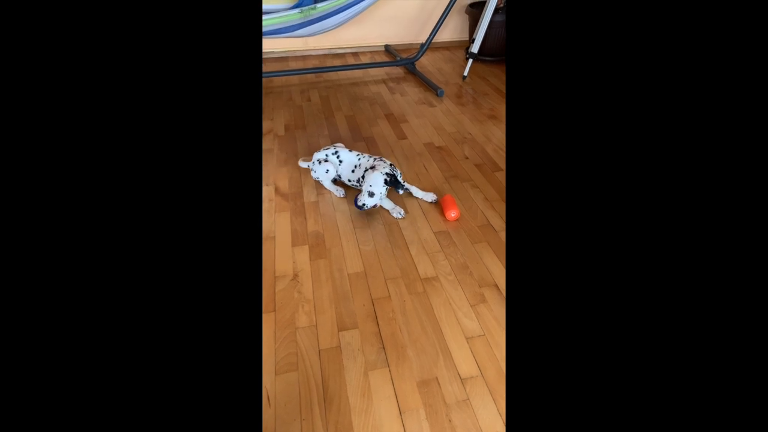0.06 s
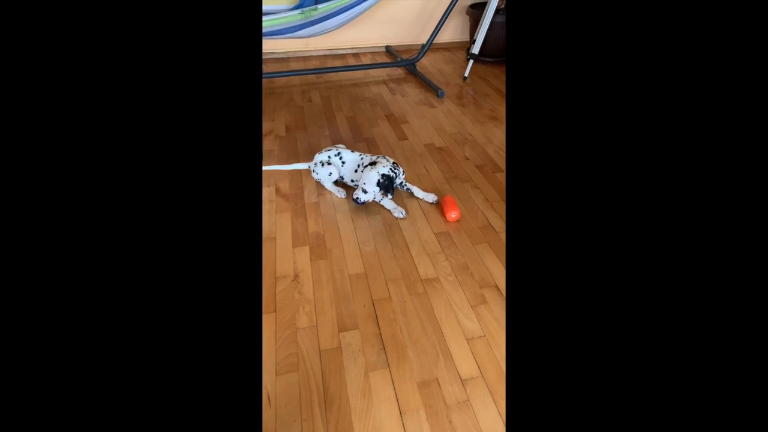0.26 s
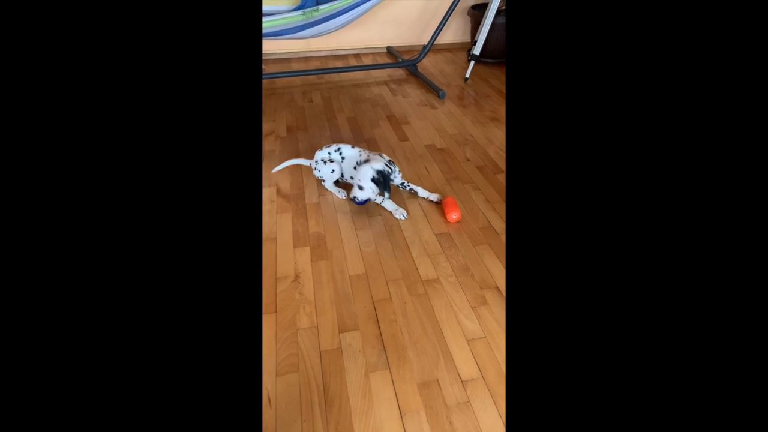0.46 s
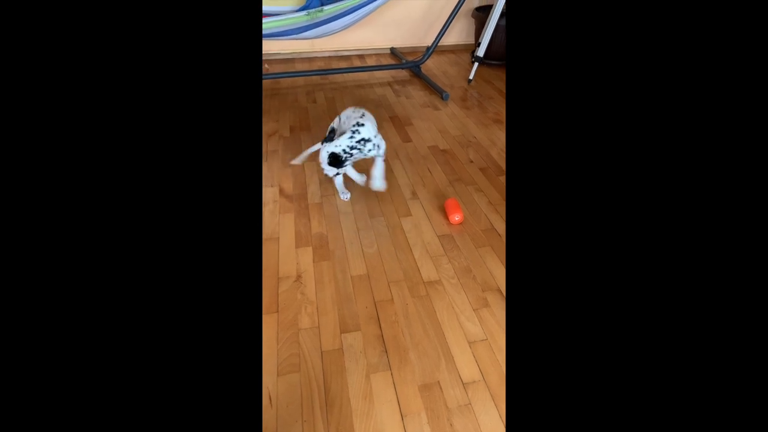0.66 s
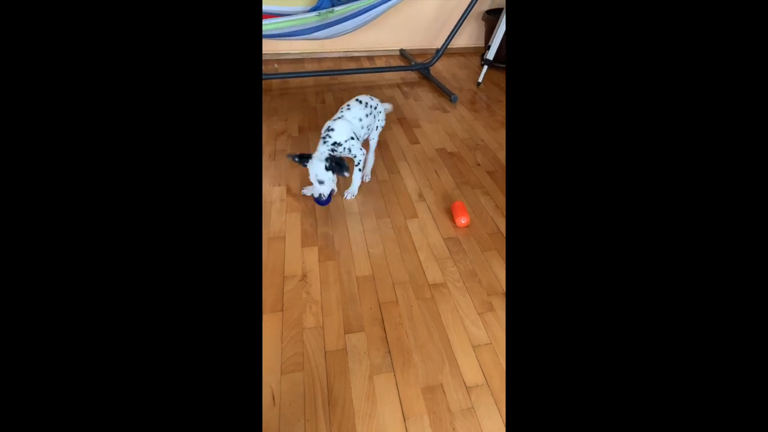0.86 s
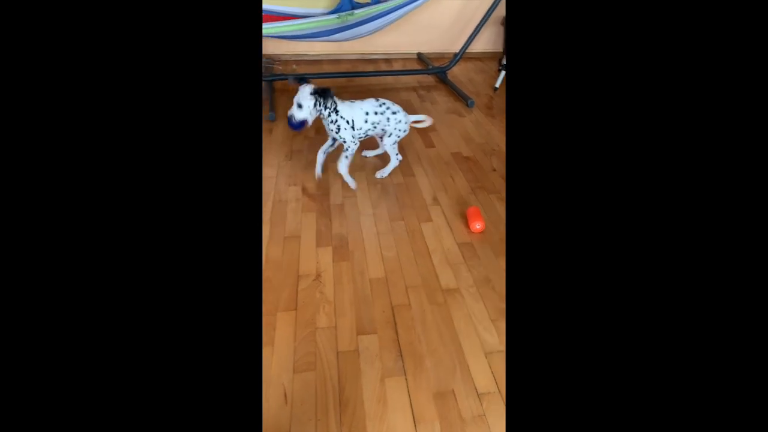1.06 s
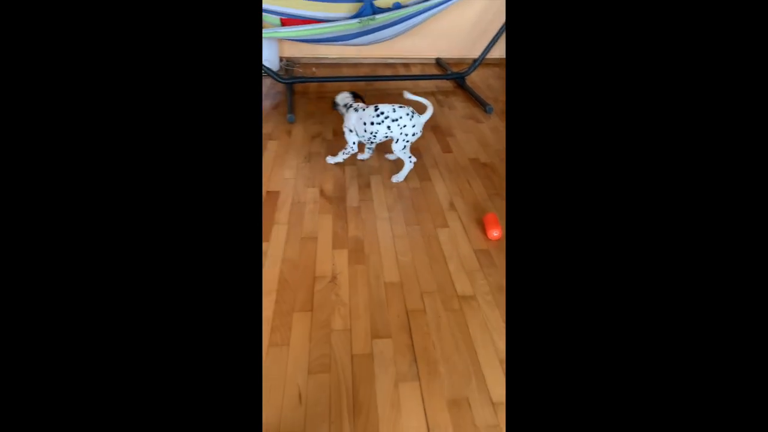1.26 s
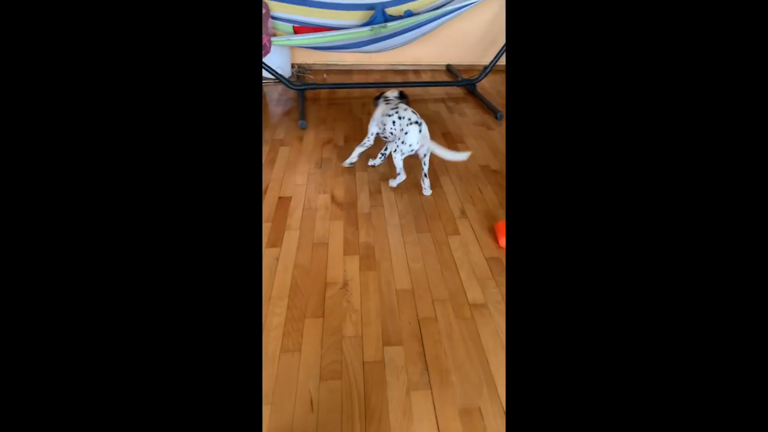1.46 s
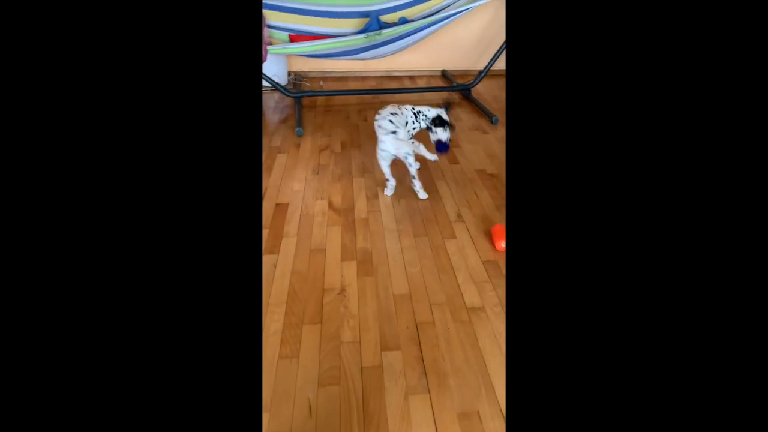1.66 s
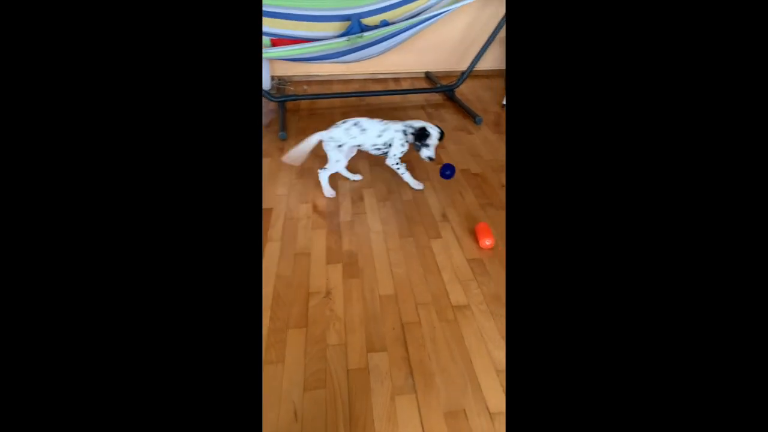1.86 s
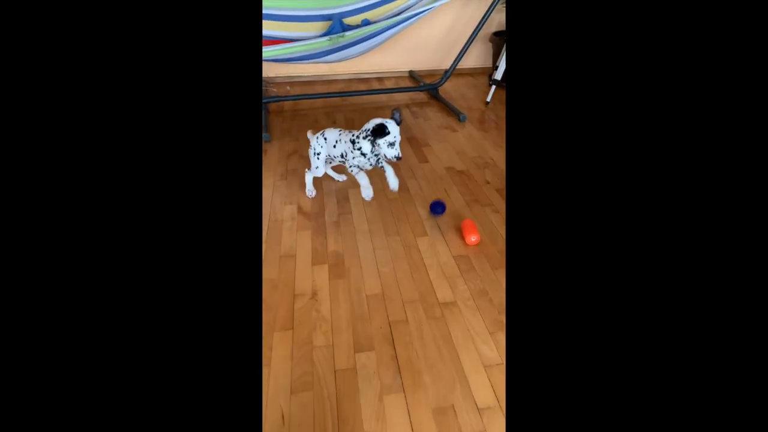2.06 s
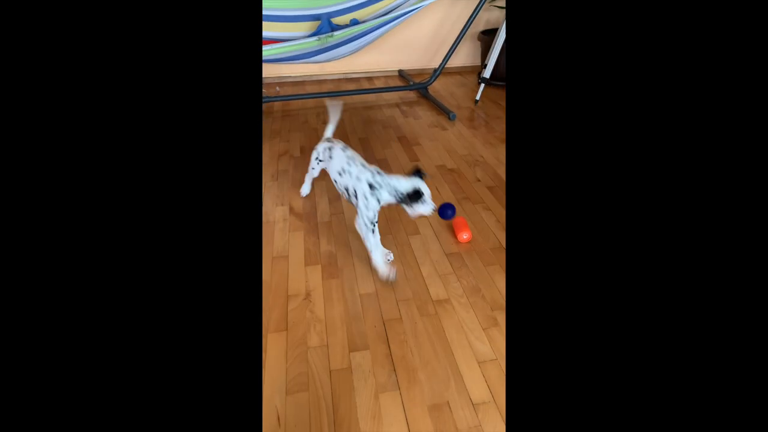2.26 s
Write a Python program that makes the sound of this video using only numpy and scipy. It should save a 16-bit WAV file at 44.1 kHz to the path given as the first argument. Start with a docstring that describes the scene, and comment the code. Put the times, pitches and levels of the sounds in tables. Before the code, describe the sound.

A toy ball squeaks as a puppy bites it: a loud rising squeak at 0.2 seconds, a shorter, lower one at 0.7, and a raspy rising one around 1.5, each echoing in the room. Paws pad on the wooden floor between them, with a heavier thud at 1.2. The ball drops at 1.75 and bounces at about 2.1 and 2.3 seconds. A faint low hum lies underneath.

```python
"""The echo of a squeak dies away in a bare room, then a puppy bites its squeaker ball three more times.
Each bite drives air past a reed, whose pitch follows the squeeze and whose harmonics sweep through
the resonances of a small horn. The ball drops and bounces, and paws thud on the wooden floor:
each impact excites damped resonances. A low hum lies beneath, and the walls reverberate."""
import sys
import numpy as np
from scipy import signal
from scipy.fft import rfft, irfft, next_fast_len
from scipy.io import wavfile
from scipy.ndimage import map_coordinates

SR = 44100
rng = np.random.default_rng(int(sys.argv[2]) if len(sys.argv) > 2 else 0)


def wrap_up_sound(samples):
    """Save the sound to the file named by the first command line argument, as 16-bit audio."""
    columns = np.atleast_2d(samples).T
    # keep every value between -1 and 1, then stretch to whole-number steps
    tamed = np.clip(columns, -1, 1)
    steps = np.round(tamed * 32767).astype(np.int16)
    wavfile.write(sys.argv[1], SR, steps)


N = 101429
LEAD_IN = SR // 2  # samples before time zero, in which the first bite falls
TOP_HZ, BOARD_RISE_S = 15700, .018


def amp(db):
    """Amplitude grows tenfold for every 20 dB."""
    return 10 ** (np.asarray(db) / 20)


def along(points, hz):
    """Interpolation of (Hz, value) points on a logarithmic frequency axis."""
    freqs, values = np.transpose(points)
    return np.interp(np.log(hz + 1), np.log(freqs + 1), values)


def clock():
    """Sample times in seconds, negative during the lead-in."""
    return np.arange(-LEAD_IN, N) / SR


def wobble(rate):
    """Smooth random modulation: a spline through `rate` random values a second."""
    at = np.arange(N + LEAD_IN) * rate / SR
    return map_coordinates(rng.standard_normal(4096), [at], mode="wrap")


def filtered(x, response):
    """Linear filtering multiplies the spectrum by a frequency response."""
    n = x.shape[-1]
    size = next_fast_len(n + 8192)
    return irfft(rfft(x, size) * response(np.fft.rfftfreq(size, 1 / SR)), size)[..., :n]


def noise(spectrum):
    """Spectral shaping turns white noise into coloured noise, scaled to rms 1."""
    x = filtered(rng.standard_normal(N + LEAD_IN), lambda hz: amp(along(spectrum, hz)))
    return x / np.sqrt(np.mean(x ** 2) + 1e-20)


def spread(pair):
    """Partial coherence: two independent signals mix, as mid and side, into left and right."""
    # Each row: frequency in Hz, left-right coherence from 0 to 1.
    coherence = [(60, .85), (130, 0.99), (300, 1), (640, 0.23), (1400, 0.53), (2800, 0.1), (4500, 0.27),
                 (7000, 1), (13000, 0.68)]
    angle = lambda hz: np.arccos(np.clip(along(coherence, hz), 0, 1)) / 2
    mid, side = filtered(pair, lambda hz: np.array([np.cos(angle(hz)), np.sin(angle(hz))]))
    return np.array([mid + side, mid - side])


def impacts(hits, spectrum, rise_s, t60_s):
    """Dense damped modes act as decaying noise; hits (start in s, level in dB) add in power."""
    power = 0
    for start, db in hits:
        age = np.maximum(clock() - start, 0)
        shape = (1 - np.exp(-age / rise_s)) * amp(-60 * age / t60_s)
        power = power + (amp(db) * shape / shape.max()) ** 2
    return np.sqrt(power) * noise(spectrum)


def room(x, tail_db, early_db):
    """Convolution adds early reflections off floor and furniture and the reverberation of bare walls."""
    # Each row: frequency in Hz, reverberation time in seconds.
    decay = [(100, .5), (500, 0.71), (1400, 0.63), (4000, 0.63), (7500, 0.56), (12000, 0.36)]
    # Each row: frequency in Hz, relative level of the tail in dB.
    colour = [(200, 2), (1300, 2.5), (2500, -5), (4500, 5), (7500, -5), (12000, 3.5)]
    build_s, early_t60_s = .022, .14
    hz, t, bands = signal.stft(rng.standard_normal((2, SR)), SR, nperseg=256)
    bands = bands * amp(along(colour, hz)[:, None] - 60 * t / along(decay, hz)[:, None])
    age = np.arange(SR) / SR
    tail = signal.istft(bands, SR, nperseg=256)[1][:, :SR] * (1 - np.exp(-age / build_s))
    sparse_echoes = rng.standard_normal((2, SR)) * (rng.random(SR) < .02)
    early = sparse_echoes * amp(-60 * age / early_t60_s) * (age > .002)
    response = amp(tail_db) * tail / np.linalg.norm(tail[0])
    response += amp(early_db) * early / np.linalg.norm(early[0])
    return x + spread(signal.fftconvolve(x[None], response, axes=1)[:, :len(x)])


def background():
    """Superposition of low diffuse noise and a hum whose phase wanders slightly."""
    # Each row: frequency in Hz, relative level in dB.
    rumble = [(20, -27), (35, -3.5), (50, -23.5), (66, -1), (80, -17.5), (110, -1), (150, -18), (200, -23),
              (260, -18.5), (420, -17), (700, -28.5), (1400, -31.5), (2500, -41), (8000, -51.5),
              (15000, -60.5)]
    # Each row: frequency of a tone in Hz, peak level in dB.
    tones = [(66.7, -51.5), (200, -61.5)]
    hum = sum(amp(db) * np.sin(2 * np.pi * hz * clock() + .25 * wobble(5)) for hz, db in tones)
    return amp(-55.5) * spread(np.array([noise(rumble), noise(rumble)])) + hum


def boom(start_s=1.21):
    """Free vibration: a heavy paw fall leaves a few low modes ringing."""
    # Each row: frequency in Hz, level in dB, time to fall 60 dB in seconds.
    modes = [(107, -40.5, 2), (131.8, -49, 2.7), (211, -47, 1.3)]
    age = np.maximum(clock() - start_s, 0)
    ring = sum(amp(db - 60 * age / t60) * np.sin(2 * np.pi * hz * age) for hz, db, t60 in modes)
    return ring * (1 - np.exp(-age / BOARD_RISE_S))


def knocks():
    """Impact excitation by ball and paws: a short contact, the boards' thud, the ball's hollow note."""
    # Each row: start in seconds, contact level in dB, contact pitch in Hz, board level in dB.
    strikes = [(.592, -43, 830, -54.5), (0.976, -53.5, 1200, -75), (1.105, -53, 1400, -53.5),
               (1.201, -51, 1200, -36.5), (1.75, -35.5, 820, -41.5), (2.088, -37, 893, -32),
               (2.246, -64, 1700, -41.5), (2.278, -47, 1528, -36.5)]
    # Each row: start in seconds, level in dB.
    soft_steps = [(.52, -58.5), (0.722, -49.5), (.8, -45), (.87, -47.5), (1.678, -42.5)]
    ball_hits = [(.592, -45.5), (1.753, -34.5), (2.09, -45), (2.279, -38)]
    # Each row: frequency in Hz, relative level in dB.
    contact_at_1khz = [(100, -13.5), (300, -10.5), (650, 0.5), (1000, 12), (1400, -8), (2300, -10),
                       (3100, -25), (4400, -15.5), (7000, -31), (12000, -56)]
    board_spectrum = [(30, -28.5), (70, 12), (100, 5.5), (200, -1.5), (350, -11), (550, -19), (1000, -22),
                      (3000, -84)]
    ball_spectrum = [(100, -22.5), (230, -7.5), (310, -2.5), (460, -5), (600, -19), (1500, -44),
                     (4000, -65)]
    contact = 0
    for start, db, pitch_hz, _ in strikes:
        spectrum = np.array(contact_at_1khz) * [pitch_hz / 1000, 1]
        contact = contact + impacts([(start, db)], spectrum, rise_s=.0012, t60_s=.035)
    thuds = [(start, db) for start, _, _, db in strikes] + soft_steps
    boards = impacts(thuds, board_spectrum, BOARD_RISE_S, t60_s=.24)
    return contact + boards + impacts(ball_hits, ball_spectrum, rise_s=.014, t60_s=.12)


def reed_clicks():
    """An onset transient: the reed clicks as it opens."""
    # Each row: start in seconds, level in dB.
    openings = [(.201, -48), (.665, -32)]
    # Each row: frequency in Hz, relative level in dB.
    spectrum = [(1000, -35), (4000, -19.5), (7500, 1.5), (9500, -3), (15000, -15.5)]
    return impacts(openings, spectrum, rise_s=.0005, t60_s=.012)


def reed(bite, fundamental_db, octave_db, middle_db):
    """Source and filter: the horn's resonances colour the reed's harmonics and the rushing air."""
    # Each row: frequency in Hz, gain in dB.
    horn = [(500, -45), (900, -12.5), (1150, -11.5), (1450, -11.5), (1800, -11.5), (2300, -11),
            (3000, -14.5), (3600, -17.5), (4400, -14.5), (5100, -14.5), (6200, -9), (7200, -0.5),
            (8400, -4.5), (9300, -9), (11500, -26), (13500, -26), (15500, -17)]
    # Each row: frequency in Hz, share of middle_db applied there.
    middle_band = [(2400, 0), (3200, 1), (5800, 1), (6800, 0)]
    attack_s, release_s, jitter, flutter_db = .003, .0013, .0028, 2.5
    overblown_hz, rasp_per_hz = 1380, .00018  # above this pitch the reed turns rough
    air_db, air_db_per_hz = -34, .0203  # more air hisses past as the squeeze drives the pitch up
    times, pitch, level_db = np.transpose(bite)
    on = (clock() > times[0] - attack_s / 2) & (clock() < times[-1] + .05)
    t = clock()[on]
    f0 = np.interp(t, times, pitch)
    rasp = rasp_per_hz * np.maximum(f0 - overblown_hz, 0)
    f0 = f0 * (1 + jitter * wobble(500)[on] + rasp * wobble(900)[on])
    phase = 2 * np.pi * np.cumsum(f0) / SR
    air = amp(air_db + air_db_per_hz * (f0 - pitch.min())) * noise(horn)[on]
    tone = 0
    for k in range(1, 17):
        hz = k * f0
        db = along(horn, hz) + fundamental_db * (k == 1) + octave_db * (k == 2)
        db += middle_db * along(middle_band, hz) + flutter_db * wobble(90)[on]
        tone = tone + amp(db) * (hz < TOP_HZ) * np.sin(k * phase + rng.uniform(0, np.pi))
    attack = np.clip((t - times[0]) / attack_s + .5, 0, 1)
    release = np.exp(-np.maximum(t - times[-1], 0) / release_s)
    out = np.zeros(N + LEAD_IN)
    out[on] = (air + tone) * attack * release * amp(np.interp(t, times, level_db))
    return out


def squeaks():
    """Flow-driven oscillation: each bite blows the reed, and the room reverberates."""
    # Each row: time in seconds, reed pitch in Hz, level ahead of the horn in dB.
    lead_in_bite = [(-.3, 1100, -23), (-.24, 1380, -19.5), (-.19, 1440, -35.5)]
    long_bite = [(.2, 945, -29.5), (.23, 982, -27), (.242, 1052, -19), (.262, 1070, -22),
                 (.276, 1128, -19.5), (.298, 1210, -17.5), (.312, 1311, -14.5), (.328, 1362, -21),
                 (.339, 1463, -11.5), (.347, 1484, -14.5), (.356, 1427, -14.5), (.361, 1334, -24.5),
                 (.374, 993, -30.5)]
    low_bite = [(.664, 1003, -24.5), (.669, 1102, -30), (.676, 986, -26), (.681, 1015, -26),
                (.691, 1221, -19.5), (.696, 1226, -25), (.705, 1035, -24), (.721, 1014, -28.5),
                (.727, 965.6, -34.5), (.76, 939, -28.5)]
    high_bite = [(1.437, 951.4, -38), (1.452, 967.7, -35.5), (1.472, 939.6, -34.5), (1.496, 1019, -33.5),
                 (1.508, 1111, -25.5), (1.519, 1312, -23), (1.538, 1399, -20.5), (1.549, 1627, -18),
                 (1.562, 1481, -26), (1.576, 1626, -22.5), (1.592, 953, -31.5)]
    return (room(reed(lead_in_bite, -1, -1, .86), tail_db=-9, early_db=-4)
            + room(reed(long_bite, 0, 0, .75), tail_db=-6.5, early_db=-9.5)
            + room(reed(low_bite, -6, -1.7, -1.5), tail_db=-4, early_db=-1)
            + room(reed(high_bite, -2.4, -.5, -.5), tail_db=-.5, early_db=-.65))


def scene():
    """Superposition of all sources, heard from time zero."""
    squeaker = squeaks()
    hits = room(knocks() + reed_clicks(), tail_db=-6.5, early_db=-4.5)
    return (squeaker + hits + boom() + background())[:, LEAD_IN:]


def record(dry):
    """Two microphone ports differ in phase and level, and share a treble notch and a band limit."""
    # Each row: frequency in Hz, phase lead of the left port in radians.
    phase_lead = [(0, -2), (520, 0.96), (950, 5.5), (1890, 7.0), (3100, 3.5), (3450, 2.2), (4050, 1.65),
                  (5080, 4), (6370, 5.5), (7410, 6), (9040, 9.0), (10200, 9.5), (11700, 12), (13000, 14),
                  (14000, 15.5), (15200, 17)]
    # Each row: frequency in Hz, left minus right level in dB.
    balance = [(60, -1.5), (99, 1.5), (160, -2), (270, 0.5), (450, -0.5), (740, 6.5), (1220, -0.5),
               (2010, -2.5), (3330, -1), (5500, 1.5), (9080, -0.5), (15000, 1)]
    # Each row: frequency in Hz, gain of both ports in dB.
    response = [(8700, 1.5), (9200, -3), (9600, -35), (10050, -23), (10500, 4), (13600, 2.5),
                (14200, -14.5), (14700, -37)]
    sides = np.array([[.5], [-.5]])
    gain = lambda hz: amp(sides * along(balance, hz) + along(response, hz)) * (hz < TOP_HZ)
    return filtered(dry, lambda hz: gain(hz) * np.exp(1j * sides * along(phase_lead, hz)))


dry = scene()
out = record(dry)
wrap_up_sound(out)
```